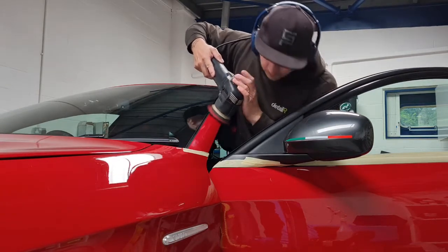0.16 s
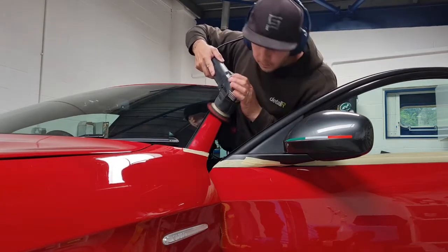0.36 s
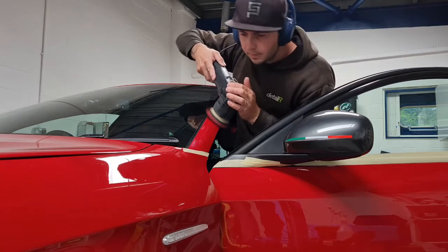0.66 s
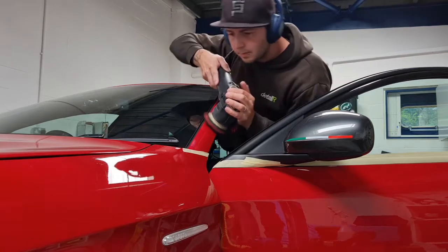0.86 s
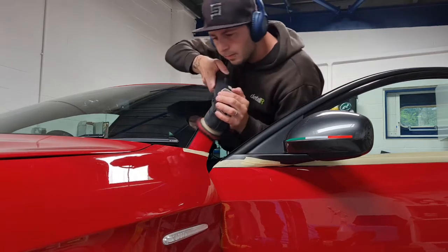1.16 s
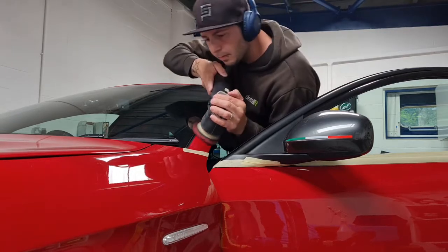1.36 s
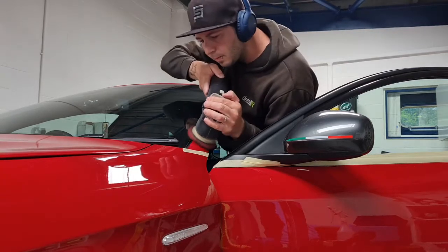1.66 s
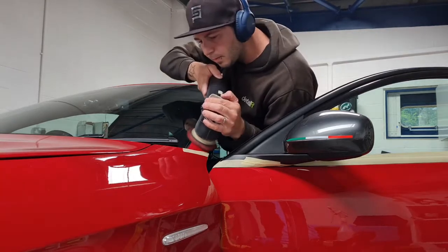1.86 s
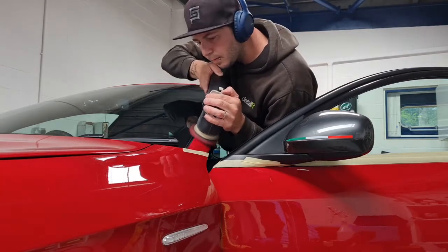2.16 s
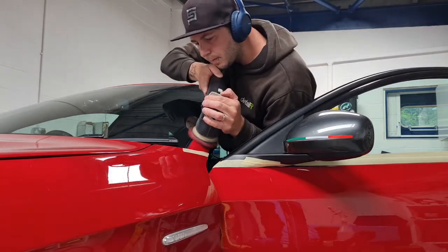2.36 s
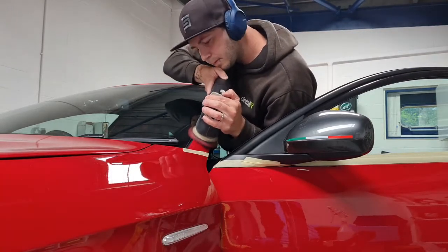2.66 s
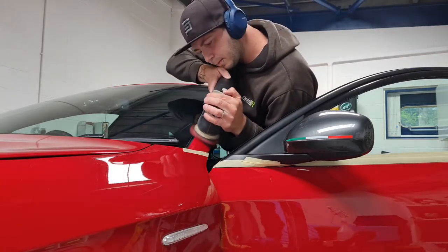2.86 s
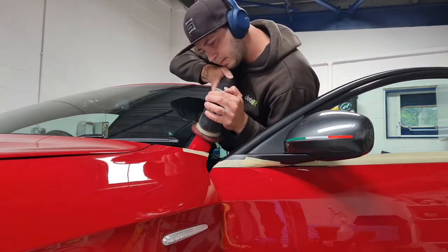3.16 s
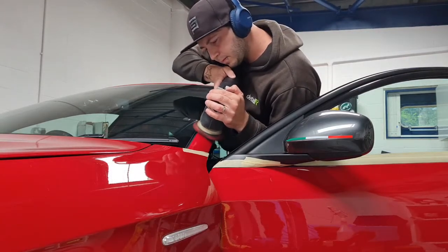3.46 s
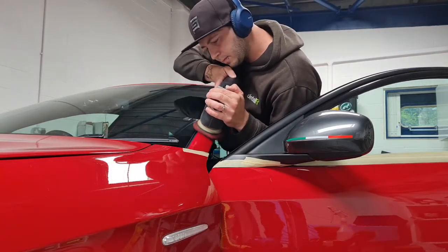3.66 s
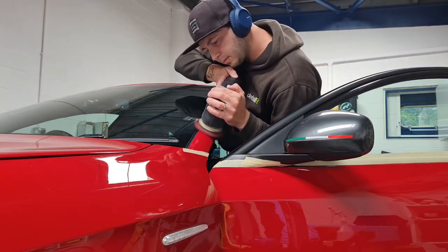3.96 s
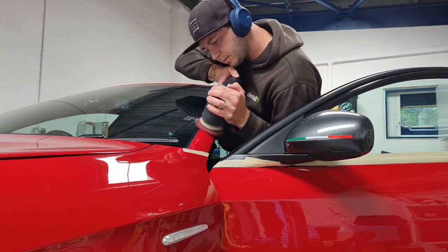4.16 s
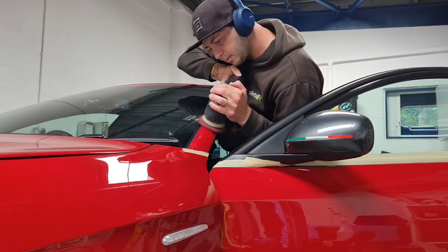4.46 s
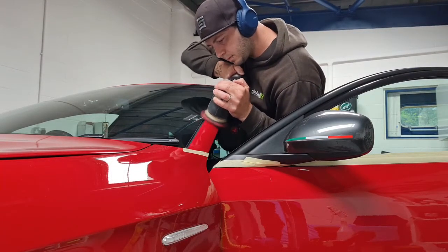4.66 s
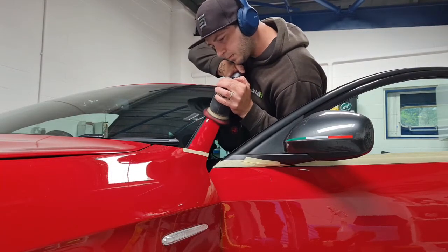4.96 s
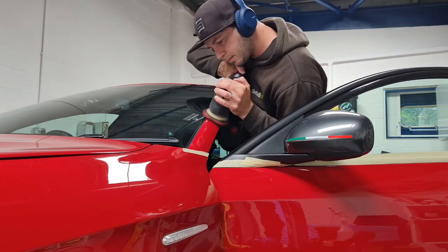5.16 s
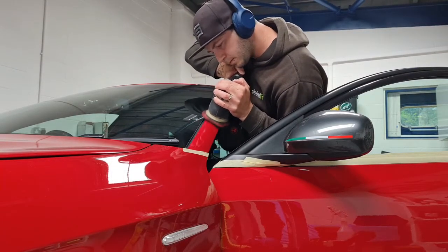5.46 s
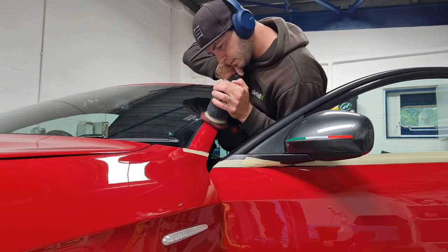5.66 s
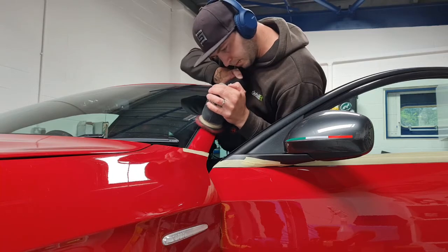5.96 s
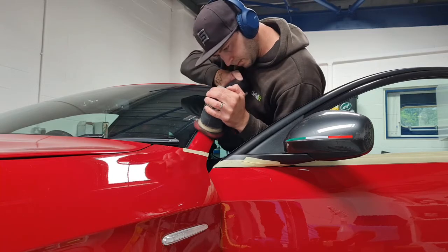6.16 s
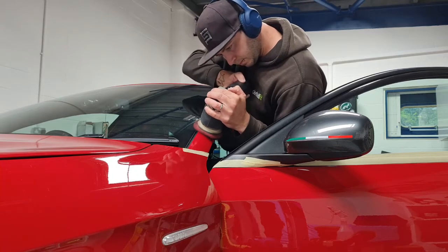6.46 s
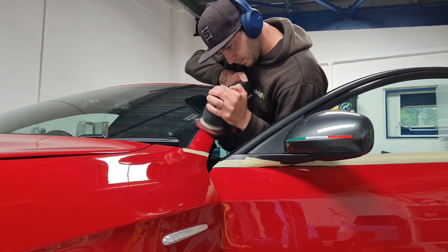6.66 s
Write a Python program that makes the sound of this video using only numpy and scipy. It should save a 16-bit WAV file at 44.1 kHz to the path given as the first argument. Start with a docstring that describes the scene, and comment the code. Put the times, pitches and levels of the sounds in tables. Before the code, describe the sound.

Continuous electric polisher drone: low buzzing hum, rattling gears, broad hiss of air and foam, and a shimmering shrill motor whine that barely sags in pitch.

```python
"""A handheld electric polisher runs against a car pillar in a garage, heard in stereo.
The motor shaft whines at many multiples of its speed. A 9:43 gear pair turns the off-centre pad, which hums
and shakes the tool. The gear head rattles, the cooling air and the foam pad rush, and a low noise rumbles.
The walls make the tones fade in and out; the noises are shaped random noise that beats with pad and shaft."""
import sys
import numpy as np
from scipy import signal
from scipy.fft import rfft, irfft, next_fast_len
from scipy.io import wavfile
from scipy.ndimage import uniform_filter1d

SR = 44100
rng = np.random.default_rng(int(sys.argv[2]) if len(sys.argv) > 2 else 0)


def output_pcm(signal):
    """Save a mono or channel-first signal as 16-bit PCM at the path in sys.argv[1].

    Samples are clipped to [-1, 1] before scaling.
    """
    pcm = np.clip(np.atleast_2d(signal).T, -1, 1) * 32767
    wavfile.write(sys.argv[1], SR, np.round(pcm).astype(np.int16))


N = 300321
GEAR = 9 / 43  # pad turns per shaft turn

# How the tool is pressed on the car, levels before the band boosts:
# t/s, rattle level/dB, rush level/dB, pressure on the pad (0-1)
PRESSING = [(0.0, -24, -16, 0.64), (0.34, -26, -17.5, 0.44), (0.75, -22.5, -17.5, 0.26),
            (1.1, -20, -17.5, 0.25), (1.36, -22, -17, 0.51), (2.04, -25, -16, 0.78),
            (2.72, -26, -16.5, 0.93), (3.4, -22, -17, 0.66), (4.09, -24.5, -16.5, 0.75),
            (4.43, -24, -17, 0.72), (4.9, -22.5, -17.5, 0.72), (5.6, -24, -16.5, 0.86),
            (6.3, -25.5, -16, 0.84), (6.81, -27, -16, 0.93)]
# Steady tones of pad and motor: t/s, pad hum level/dB, its second multiple level/dB,
# its third multiple level/dB, shaft tone level/dB
HUM_LEVELS = [(0, -22, -51, -44, -30), (.17, -22.5, -56, -37, -33), (.42, -23, -53, -46, -40.5),
              (.83, -21.5, -49, -35.5, -29.5), (1.1, -21, -42, -41, -28.5), (1.49, -20, -39, -46, -29.5),
              (1.83, -21, -41, -43, -29), (2.3, -21.3, -48, -44, -32.5), (2.72, -21.3, -39, -49, -32.5),
              (3.06, -20.5, -63, -49, -34), (4.2, -21.5, -57, -41, -35), (4.8, -21.5, -50.5, -40.5, -34.5),
              (5.4, -21.8, -43.5, -38.5, -36.5), (6.3, -20.5, -76, -41, -34.5),
              (6.81, -21.5, -60, -50, -35.5)]


def gain_of(db):
    """Turns decibels into a factor."""
    return 10 ** (np.asarray(db) / 20)


def evened(x):
    """Scales a signal to an average strength (rms) of 1."""
    return x / np.sqrt(np.mean(abs(x) ** 2) + 1e-20)


def read(points, hz):
    """Reads a curve between its points on a log-frequency axis."""
    f, value = np.transpose(points)
    return np.interp(np.log(hz + 1), np.log(f + 1), value)


def curves(rows):
    """Joins table rows by straight lines, one value a sample for each column after the time."""
    s, *columns = np.transpose(rows)
    return [np.interp(np.arange(N) / SR, s, column) for column in columns]


def pressed(ends_db):
    """Moves a level from its light-pressure value to its full-pressure value."""
    light_db, full_db = ends_db
    pressure = curves(PRESSING)[2]
    return light_db + (full_db - light_db) * pressure


def swell(x, low_hz, high_hz, db):
    """Adds a filtered band to x, so that the band rises or sinks by a level curve."""
    band_filter = signal.butter(1, [low_hz, high_hz], "band", fs=SR, output="sos")
    return x + (gain_of(db) - 1) * signal.sosfilt(band_filter, x)


def stereo(front, sides):
    """Turns sound from the front and from the sides into left (sum) and right (difference)."""
    return np.array([front + sides, front - sides])


def fading(width_hz, steady):
    """Adds many echo paths into a turning complex gain of mean power about 1; steady is the direct share."""
    t = np.arange(N // 200 + 2) * 200 / SR  # one point every 200 samples
    spread, start = rng.standard_normal(24), rng.random(24)
    turning = np.exp(2j * np.pi * (width_hz * spread * t[:, None] + start))
    paths = evened(turning.sum(1))
    share = np.clip(steady, 0, 1)
    return np.interp(np.arange(N) / SR, t, np.sqrt(share) + np.sqrt(1 - share) * paths)


def noise(shape, turns, patchy_db):
    """Makes two partly alike noises with a given spectrum and drifting patches, beating with pad and shaft."""
    # likeness of left and right before the shift: f/Hz, likeness (0-1)
    likeness = [(25, .7), (60, .8), (200, .92), (500, .8), (800, .7), (1200, .45), (1600, .27), (3500, .25),
                (8000, .3), (15000, .3)]
    # strength of the beat: f/Hz, factor on the beat wave
    beat_depth = [(300, 0.022), (600, 0.02), (1600, 0.046), (3200, 0.026), (6000, 0.092), (10000, .01)]
    lead = 2  # samples by which the left hears the shared part earlier
    frames, hz = N // 128 + 5, np.fft.rfftfreq(512, 1 / SR)
    a, b, c, d, patches = rng.standard_normal((frames, 257, 5)).T
    # smooth the patches over frequency, then over time
    patches = uniform_filter1d(patches, size=6, axis=0)
    patches = evened(uniform_filter1d(patches, size=30, axis=1))

    same = np.clip(read(likeness, hz), -1, 1)[:, None]
    early = np.exp(2j * np.pi * hz * lead / SR)[:, None]
    right = a + 1j * b
    left = same * early * right + np.sqrt(1 - same ** 2) * (c + 1j * d)
    z = np.array([left, right]) * gain_of(patchy_db * patches)

    pad_beat = np.cos(2 * np.pi * (GEAR * turns + 0.2)) + .5 * np.cos(4 * np.pi * GEAR * turns)
    beat = pad_beat + 1.3 * np.cos(2 * np.pi * turns)
    both = [z, z * read(beat_depth, hz)[:, None]]
    plain, beating = signal.istft(both, nperseg=512, noverlap=384)[1][..., :N]
    spectrum = rfft(plain + beat * beating)
    return evened(irfft(spectrum * shape(np.fft.rfftfreq(N, 1 / SR)), N))


def rumble(turns):
    """The pad drums on the car body: low noise, louder under pressure."""
    # rough spectrum of the low rumble: f/Hz, relative level per Hz/dB
    low_spectrum = [(20, -9), (40, -2), (60, 7.5), (120, 0), (170, 2.5), (205, -10), (240, 3.5), (290, 8),
                    (380, -1), (450, 5.5), (600, -27)]
    drumming = noise(lambda hz: gain_of(read(low_spectrum, hz)), turns, patchy_db=1.0)
    return gain_of(pressed((-38, -34.5))) * drumming


def rush(turns):
    """Cooling air and the foam pad on paint make a wide noise, which is duller under pressure."""
    # rush of air and pad: f/Hz, relative level per Hz/dB
    air_spectrum = [(300, -18.5), (500, -8.5), (1200, -3), (1600, -2), (2000, -4.5), (2700, -1.5),
                    (3100, -4.5), (3500, -3.5), (4000, -5), (4500, -3), (5500, -7.5), (7700, -6),
                    (8800, -15), (10500, -7.5)]
    # top of the rush, added to the curve above: f/Hz, change/dB
    fizz = [(10500, 0), (11000, -1), (12000, 1), (13000, -3), (14600, -3), (15300, -5)]
    air = noise(lambda hz: gain_of(read(air_spectrum, hz) + read(fizz, hz)), turns, patchy_db=1.15)
    level_db = curves(PRESSING)[1]
    return gain_of(level_db) * swell(air, 4740, 6410, pressed((9.5, 3)))


def rattle(turns):
    """Loose gear teeth chatter in time with the pad and ring the gear head; pressure deepens the sound."""
    # gear head ringing, strongest ring first: f/Hz, width at half height/Hz, relative level/dB
    head = [(975, 75, 4), (570, 180, -9.5), (650, 53, -3), (707, 52, -0.5), (768, 53, 0), (882, 92, 0.5),
            (1043, 68, -2), (1123, 77, -1), (1198, 100, -5)]
    # pitch of that strongest ring as the grip shifts: t/s, f/Hz
    ring_pitch = [(0, 1009), (.8, 1015), (1.15, 990), (1.35, 945), (2.0, 931), (2.5, 930), (2.9, 950),
                  (3.4, 960), (3.9, 955), (4.2, 975), (4.5, 940), (5.1, 975), (5.7, 975), (6.2, 985),
                  (6.81, 975)]

    def ring(modes):
        """Gives a spectrum with a rounded peak at each ringing pitch."""
        return lambda hz: np.sqrt(sum(gain_of(2 * db) / (1 + (2 * (hz - f) / w) ** 2) ** 2
                                      for f, w, db in modes))

    # slide the pitch of the strongest ring by turning its complex form
    still = signal.hilbert(noise(ring(head[:1]), turns, patchy_db=1.2), next_fast_len(N))[:, :N]
    slide = np.exp(2j * np.pi * np.cumsum(curves(ring_pitch)[0] - head[0][0]) / SR)
    strongest = (still * slide).real
    others = noise(ring(head[1:]), turns, patchy_db=1.3)
    chatter = gain_of(-4.5) * strongest + gain_of(-1.4) * others

    # the chatter swells gently once and twice a pad turn
    once = 0.1 * np.cos(2 * np.pi * (GEAR * turns + 0.051))
    twice = 0.19 * np.cos(4 * np.pi * (GEAR * turns + 0.31))
    burst = 1 + once + twice
    level_db = curves(PRESSING)[0]
    return gain_of(level_db) * swell(burst * chatter, 400, 950, pressed((-13, 2.5)))


def pad(turns):
    """The off-centre pad hums at its orbit rate, wobbling with its spin; uneven contact blurs the overtones."""
    # free turning of the pad on its own axis: t/s, spin rate f/Hz, depth of the wobble (0-1)
    own_spin = [(0.0, 10.5, 0.03), (0.75, 11.15, 0.02), (1.5, 10.65, 0.015), (2.43, 10.4, 0.11),
                (2.92, 10.15, 0.09), (3.89, 10.8, 0.09), (4.38, 10.35, 0.12), (5.35, 10.27, 0.115),
                (6.32, 9.75, 0.07), (6.81, 10.05, 0.08)]
    # higher overtones: multiple of the pad turn, front level/dB, sides level/dB
    overtones = [(4, -44, -70), (8, -49, -64), (9, -44, -58), (11, -42, -53), (12, -44, -37)]
    angle = 2 * np.pi * GEAR * turns
    spin_hz, depth = curves(own_spin)
    wobble = 1 - depth * np.cos(2 * np.pi * np.cumsum(spin_hz) / SR)
    hum_db, second_db, third_db, _ = curves(HUM_LEVELS)
    hum = np.sqrt(2) * gain_of(hum_db) * wobble
    out = stereo(hum * np.cos(angle), gain_of(-18.0) * hum * np.cos(angle + 1.25))

    low = [(2, second_db, second_db - 12), (3, third_db, third_db - 19)]
    for k, front_db, sides_db in [*low, *overtones]:
        tone = np.sqrt(2) * wobble * np.exp(1j * round(k) * angle)
        front, sides = [(gain_of(db) * fading(width_hz=8., steady=0.56) * tone).real
                        for db in (front_db, sides_db)]
        out += stereo(front, sides)
    return out


def motor(turns):
    """The shaft whines at its multiples; higher ones flutter faster, as short waves feel every hand move."""
    # weak multiples: multiple of the shaft speed, mean front level/dB, mean sides level/dB
    weak = [(4, -43.5, -50), (5, -40, -43), (8, -40, -39), (10, -39, -43), (11, -40, -44), (13, -40, -44),
            (14, -40, -43), (15, -45, -43), (16, -43, -48), (17, -39.5, -44), (19, -44, -51),
            (25, -51, -52), (26, -48, -47), (27, -44, -51), (28, -51, -46), (29, -44, -47.5),
            (31, -45, -48), (32, -47, -46), (33, -45, -40), (34, -45.5, -44), (35, -47, -47)]
    # strong multiples as the tool is moved, one table each: t/s, front level/dB, sides level/dB
    second = [(0, -28, -45), (0.32, -48, -53), (0.52, -36, -54), (1.84, -32, -37), (2.4, -33.5, -46),
              (3.04, -29.5, -54), (4.08, -34, -41), (4.2, -28, -46), (4.36, -33, -41), (4.72, -30, -54),
              (4.96, -29.5, -37), (5.36, -32, -42), (6.44, -29, -54), (6.81, -33.5, -52)]
    third = [(0, -33, -43), (0.64, -34, -51), (0.92, -50, -41), (1.44, -38, -51), (2.0, -32.5, -38),
             (2.2, -44, -35), (2.36, -34.5, -43), (3.32, -32, -43), (3.48, -37, -51), (3.76, -35, -35),
             (4.0, -38, -43), (4.4, -32, -32), (4.72, -37, -44), (4.8, -55, -41), (5.96, -39, -50),
             (6.08, -35, -35), (6.64, -32.5, -33), (6.81, -39, -35)]
    sixth = [(0, -37, -41), (0.36, -43, -34), (0.44, -28, -36), (0.56, -29, -43), (0.64, -39, -32),
             (0.76, -33, -37), (0.84, -40, -48), (1.08, -31, -42), (1.32, -47, -37), (1.48, -25, -34),
             (1.68, -29.5, -48), (1.84, -36, -37), (1.96, -26.5, -37), (2.12, -28, -40), (2.24, -42, -38),
             (2.72, -24, -35), (2.88, -29, -31), (3.0, -35, -36), (3.56, -26, -29), (4.0, -31.5, -38),
             (4.28, -25.5, -31), (4.52, -23.5, -46), (4.68, -31, -38), (5.08, -24.5, -27), (5.24, -32, -29),
             (5.52, -27, -30), (5.76, -34, -38), (5.84, -25, -28), (5.92, -26, -28), (6.0, -35, -34),
             (6.24, -26, -32), (6.44, -38, -33), (6.52, -27.5, -31), (6.81, -28, -32)]
    seventh = [(0, -39, -45), (0.2, -31, -48), (0.48, -27.5, -41), (0.56, -42, -36), (0.76, -35, -50),
               (1.04, -49, -33), (1.24, -30, -39), (1.52, -40, -41), (1.88, -29, -45), (1.96, -33, -35),
               (2.6, -38, -50), (2.84, -31, -45), (2.92, -38, -37), (3.12, -36, -38), (3.24, -47, -47),
               (3.6, -47, -50), (3.76, -35, -36), (3.84, -45, -42), (4.0, -35, -35), (4.24, -32, -50),
               (4.6, -44, -39), (4.92, -31, -50), (5.04, -32, -38), (5.36, -30, -37), (5.56, -36, -41),
               (5.84, -27.5, -49), (6.04, -42, -48), (6.16, -29, -33), (6.4, -26.5, -32), (6.81, -34, -32)]
    ninth = [(0, -38, -34), (0.8, -49, -37), (0.88, -31, -36), (1.0, -29, -45), (1.2, -37, -36),
             (1.32, -32, -33), (1.72, -49, -43), (1.84, -34, -44), (2.0, -46, -40), (2.4, -34, -30),
             (2.72, -47, -34), (3.16, -32, -50), (3.36, -49, -50), (3.88, -30, -43), (3.96, -49, -39),
             (4.44, -33, -33), (5.12, -40, -35), (5.68, -35, -39), (6.44, -40, -50), (6.81, -34, -34)]
    twelfth = [(0, -36, -40), (0.2, -48, -47), (0.44, -33, -42), (1.0, -37, -47), (1.56, -34, -36),
               (1.92, -46, -39), (2.24, -33, -37), (2.32, -46, -36), (2.48, -32, -32), (2.6, -44, -42),
               (2.88, -31, -29), (3.0, -46, -27), (3.4, -37, -47), (3.48, -31.5, -38), (3.84, -36, -47),
               (4.24, -31, -47), (4.4, -41, -35), (5.2, -37, -47), (5.52, -43, -38), (5.72, -28, -36),
               (5.8, -35, -47), (6.0, -29, -33), (6.08, -43, -38), (6.32, -46, -47), (6.56, -31, -43),
               (6.81, -46, -47)]
    eighteenth = [(0, -37, -34), (0.36, -49, -34), (0.72, -32, -35), (0.8, -49, -38), (0.96, -31, -41),
                  (1.12, -45, -36), (1.2, -33, -39), (1.6, -49, -28), (2.08, -35, -39), (2.52, -38, -30),
                  (2.84, -49, -42), (2.96, -39, -29), (3.24, -49, -30), (3.76, -36, -43), (4.28, -37, -35),
                  (5.52, -42, -49), (5.76, -49, -33), (5.92, -49, -47), (6.44, -35, -32), (6.81, -30, -43)]
    twenty_fourth = [(0, -41, -32), (0.32, -35, -39), (1.36, -47, -34), (1.48, -36, -30), (1.56, -35, -36),
                     (1.76, -49, -33), (1.92, -35, -30), (2.12, -44, -32), (2.32, -31, -30),
                     (2.52, -49, -30), (2.64, -31, -39), (3.2, -40, -31), (3.48, -33, -43), (3.6, -46, -34),
                     (3.68, -36, -34), (3.88, -30, -49), (4.16, -38, -48), (4.24, -34, -40),
                     (4.36, -31, -36), (4.44, -49, -38), (4.68, -34, -43), (4.76, -43, -32),
                     (5.04, -35, -47), (5.24, -36, -36), (5.32, -41, -45), (6.0, -35, -34),
                     (6.12, -35, -33), (6.24, -33, -40), (6.48, -40, -36), (6.81, -35, -35)]
    thirtieth = [(0, -26, -31), (0.28, -30, -38), (0.4, -26, -32), (0.64, -30, -26), (0.84, -31, -31),
                 (0.92, -29, -27), (1.16, -42, -30), (1.24, -29, -27), (1.52, -41, -34), (1.64, -28, -38),
                 (2.0, -35, -35), (2.32, -26, -32), (2.48, -39, -36), (2.56, -30, -33), (2.64, -39, -37),
                 (2.88, -34, -25), (3.4, -28, -38), (3.56, -36, -30), (3.8, -28, -39), (3.88, -26, -29),
                 (4.08, -27, -30), (4.4, -38, -35), (4.48, -31, -30), (4.72, -28, -35), (4.92, -37, -27),
                 (5.08, -28, -38), (5.2, -46, -35), (5.32, -28, -34), (5.52, -36, -34), (5.64, -30, -31),
                 (5.76, -44, -36), (5.96, -36, -29), (6.04, -40, -44), (6.12, -33, -27), (6.32, -40, -36),
                 (6.36, -32, -32), (6.52, -30, -41), (6.81, -36, -32)]
    thirty_sixth = [(0, -25, -28), (0.36, -33, -29), (0.48, -24, -24), (0.64, -29, -23), (0.84, -20, -26),
                    (0.96, -33, -28), (1.04, -24, -37), (1.28, -33, -25), (1.36, -17, -20), (1.4, -21, -24),
                    (1.48, -33, -26), (1.6, -20, -25), (1.68, -39, -22), (1.84, -27, -23), (2.08, -26, -33),
                    (2.2, -29, -22), (2.28, -37, -23), (2.36, -25, -32), (2.52, -30, -26), (2.6, -21, -30),
                    (2.76, -19, -31), (2.84, -29, -28), (2.96, -23, -28), (3.08, -34, -27),
                    (3.16, -25, -28), (3.28, -30, -28), (3.64, -23, -21), (3.72, -21, -27),
                    (3.92, -39, -33), (4.32, -22, -24), (4.4, -29, -24), (4.52, -26, -32), (4.6, -29, -25),
                    (4.72, -24, -27), (4.84, -34, -20), (4.92, -30, -27), (5.16, -22, -23),
                    (5.24, -27, -27), (5.48, -18.5, -27), (5.68, -22, -23), (5.76, -35, -29),
                    (5.92, -24, -23), (6.36, -31, -37), (6.48, -21, -26), (6.56, -31, -24),
                    (6.81, -25, -39)]
    tables = [(2, second), (3, third), (6, sixth), (7, seventh), (9, ninth), (12, twelfth),
              (18, eighteenth), (24, twenty_fourth), (30, thirtieth), (36, thirty_sixth)]
    strong = [(k, *curves(rows)) for k, rows in tables]
    shaft_tone = (1, curves(HUM_LEVELS)[3], -45)  # the sides keep one mean level, in dB

    orbit = np.exp(2j * np.pi * GEAR * turns)
    out = np.zeros((2, N))
    for k, *levels_db in [shaft_tone, *strong, *weak]:
        k, parts = round(k), []
        tone = np.sqrt(2) * np.exp(2j * np.pi * k * turns)
        for db in levels_db:
            if np.ndim(db):  # the level follows a curve: the phase drifts, with a quick flutter on top
                drift = fading(width_hz=1.0 + .05 * k, steady=.55)
                fade = drift / abs(drift) * fading(width_hz=4 + 0.5 * k, steady=.93)
            else:
                fade = fading(width_hz=1.2 + .2 * k, steady=0.28)
            if k % 6 == 0:  # the shaking tool swings the magnetic whine at the pad rate: side tones
                for step, depth in ((1, 0.0055), (-1, 0.0021), (2, 0.0026), (-2, 0.0023)):
                    fade += depth * k * fading(width_hz=0.099 * k, steady=0.34) * orbit ** step
            parts.append(gain_of(db) * fade * tone)
        front, sides = parts
        turned_sides = sides * np.exp(1j * 0.075 * k)  # the phase shift grows with the multiple
        out += stereo(front.real, turned_sides.real)
    return out


def scene():
    """Adds up all parts, which follow the one shaft angle."""
    # motor speed: t/s, shaft turns f/Hz
    shaft_speed = [(0.0, 414.3), (0.17, 415.2), (0.66, 418.9), (0.83, 419.2), (1.2, 418.7), (1.55, 419.0),
                   (1.83, 418.4), (2.16, 416.2), (2.35, 415.9), (2.85, 413.6), (3.16, 413.6), (3.9, 415.35),
                   (4.15, 415.0), (4.45, 413.9), (4.65, 413.8), (4.82, 413.2), (5.15, 413.9), (5.65, 413.2),
                   (6.15, 411.0), (6.5, 410.6), (6.81, 410.7)]
    turns = np.cumsum(curves(shaft_speed)[0]) / SR
    return motor(turns) + pad(turns) + rattle(turns) + rush(turns) + rumble(turns)


def record(dry):
    """Two microphones of slightly different colour bend the highest peaks softly; then the treble is cut."""
    # treble roll-off of the microphones: f/Hz, level/dB
    roll_off = [(15150, 0), (15420, -2), (15520, -45)]
    # difference in colour: f/Hz, left minus right level/dB
    left_lean = [(60, 1.5), (130, -1.5), (260, -1), (420, 1.5), (700, 0), (1300, -1), (2400, -0.5),
                 (4400, 0.5), (8100, -0.5), (15000, 0.5)]
    hz = np.fft.rfftfreq(N, 1 / SR)
    lean_db = read(left_lean, hz) / 2
    ports = irfft(rfft(dry) * gain_of(read(roll_off, hz) + [lean_db, -lean_db]), N)
    over = np.maximum(abs(ports) - .6, 0)  # the part of each peak above 0.6
    bent = ports - np.sign(ports) * (over - .35 * np.tanh(over / .35))
    taps = signal.firwin(511, 16231, window=("kaiser", 9), fs=SR)  # low-pass, edge in Hz
    return signal.oaconvolve(bent, taps[None], "same")


dry = scene()
out = record(dry)
output_pcm(out)
```